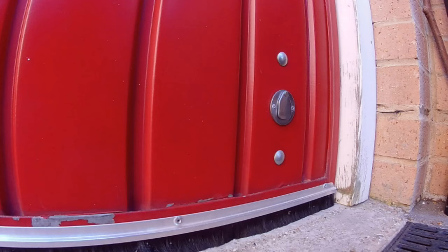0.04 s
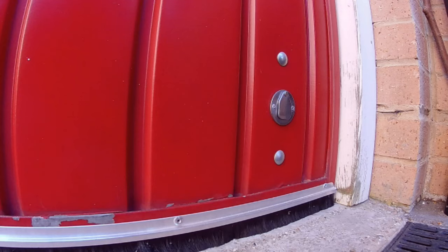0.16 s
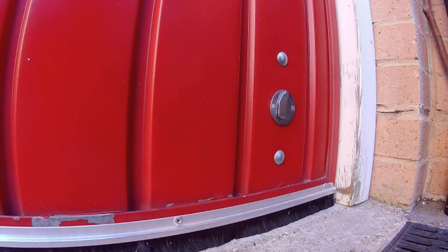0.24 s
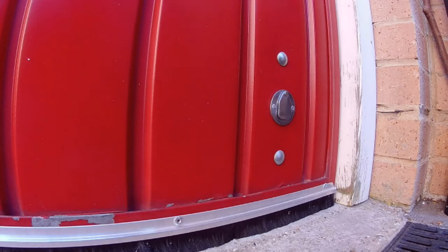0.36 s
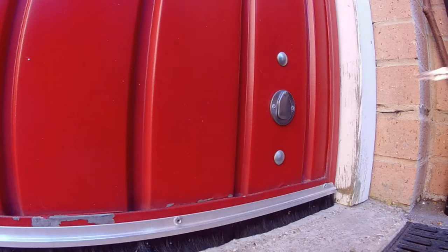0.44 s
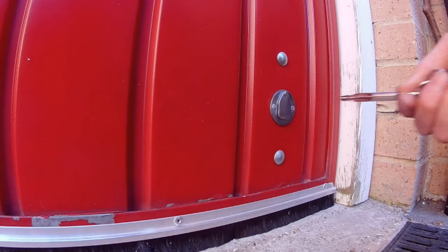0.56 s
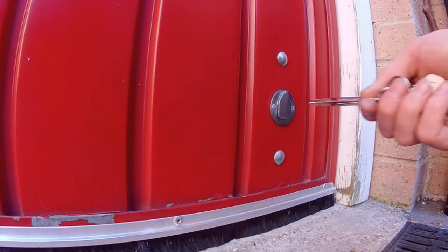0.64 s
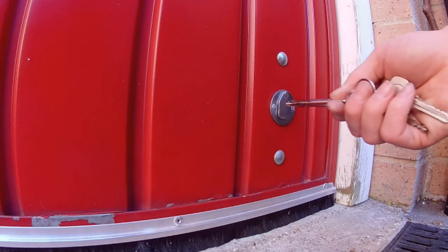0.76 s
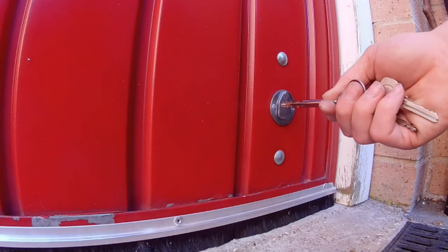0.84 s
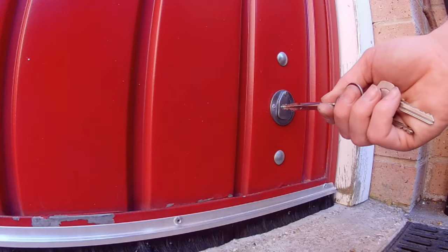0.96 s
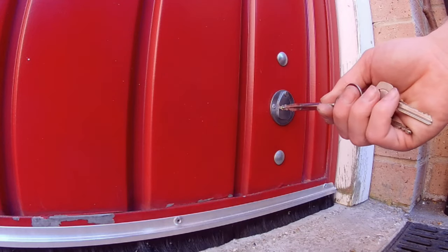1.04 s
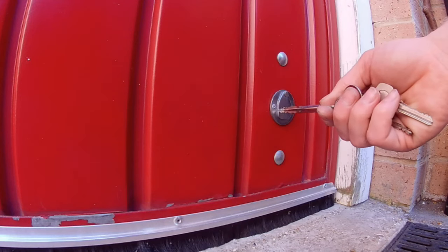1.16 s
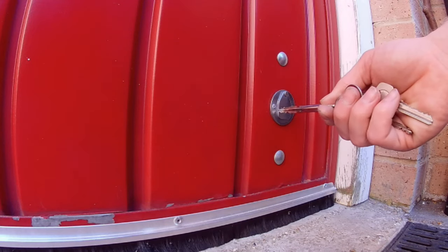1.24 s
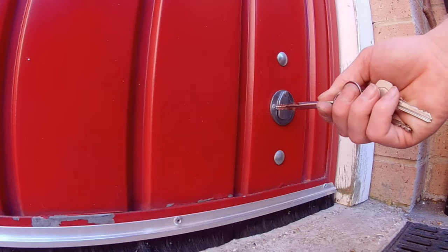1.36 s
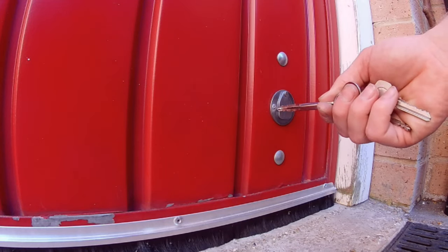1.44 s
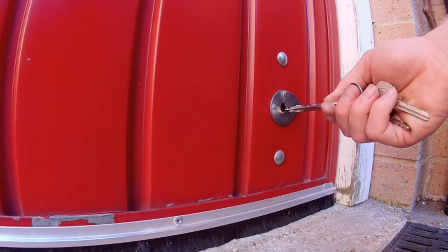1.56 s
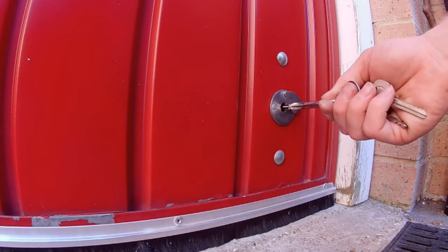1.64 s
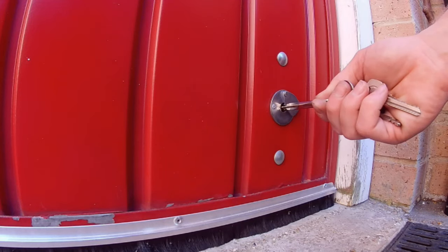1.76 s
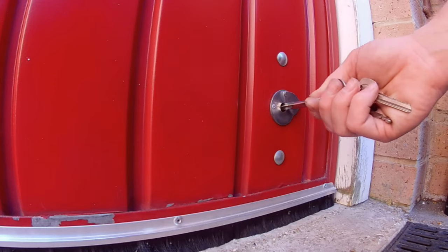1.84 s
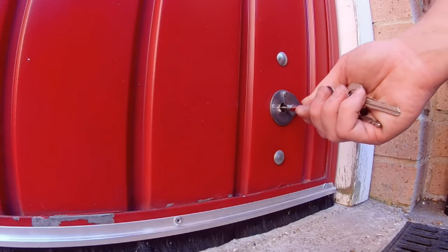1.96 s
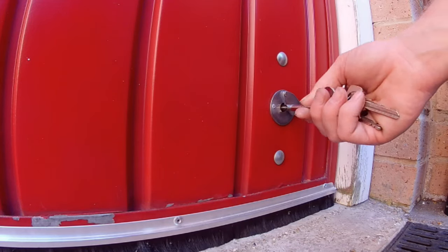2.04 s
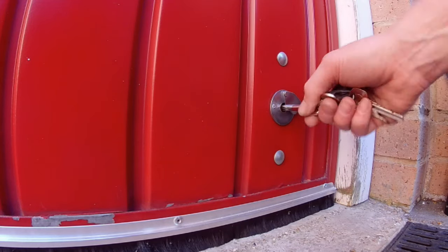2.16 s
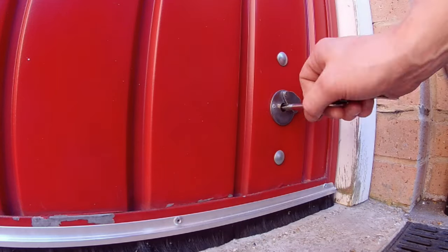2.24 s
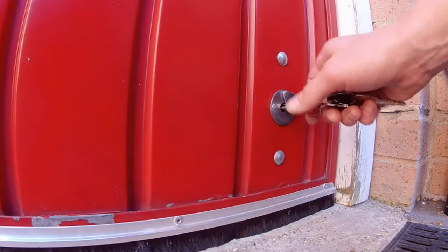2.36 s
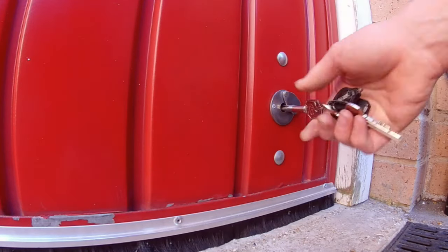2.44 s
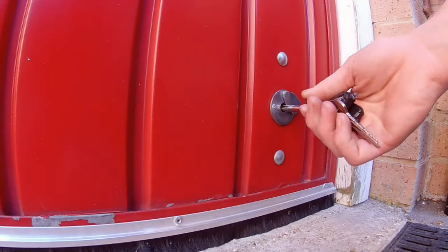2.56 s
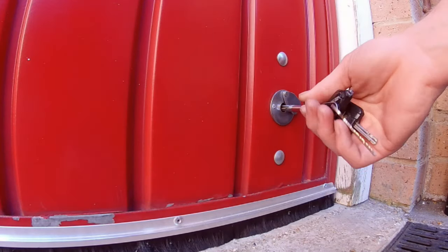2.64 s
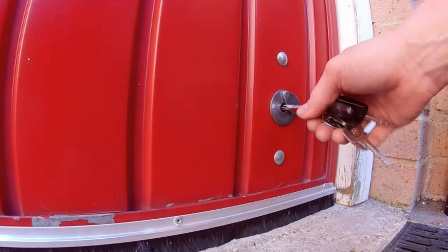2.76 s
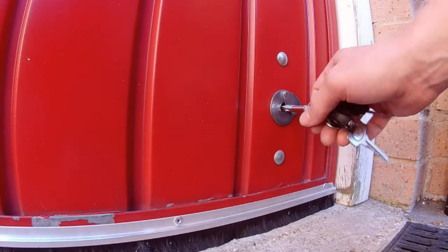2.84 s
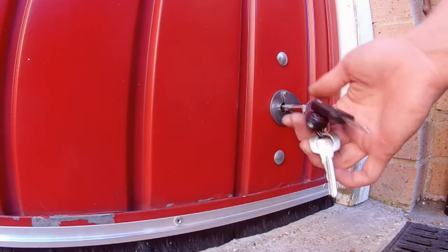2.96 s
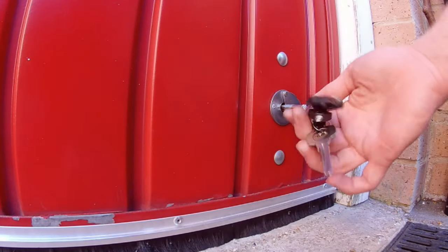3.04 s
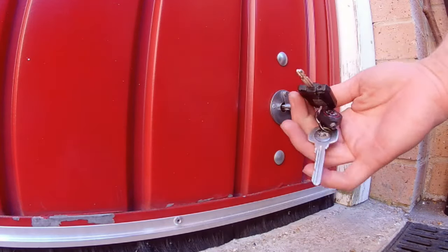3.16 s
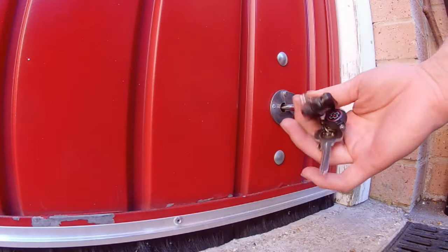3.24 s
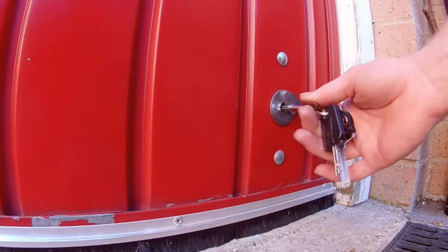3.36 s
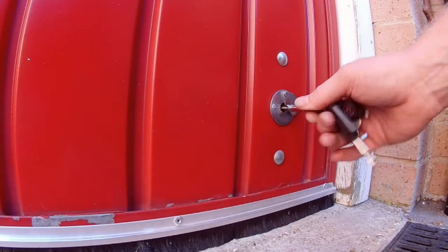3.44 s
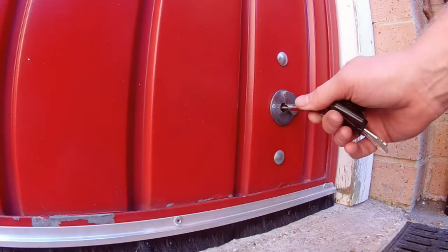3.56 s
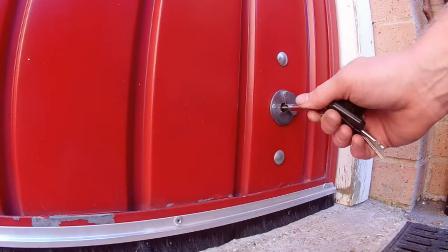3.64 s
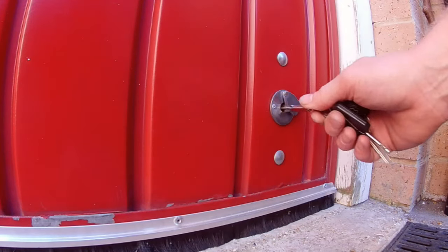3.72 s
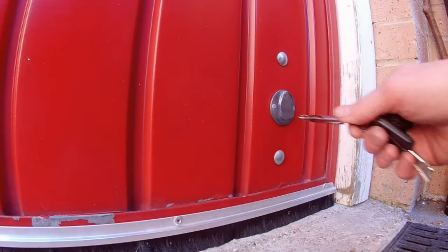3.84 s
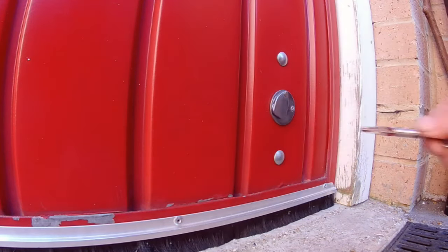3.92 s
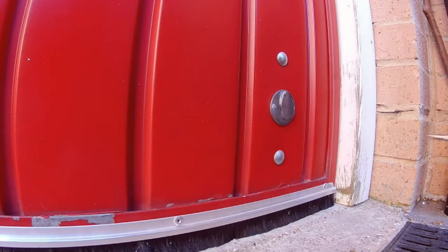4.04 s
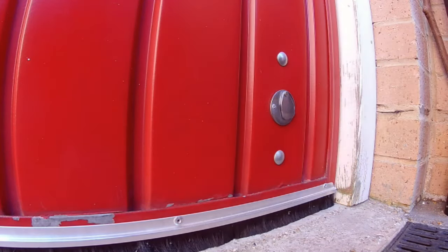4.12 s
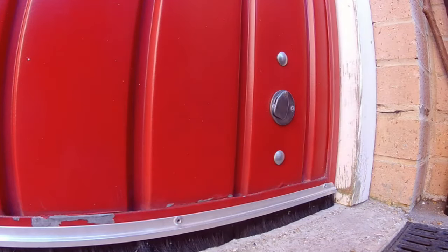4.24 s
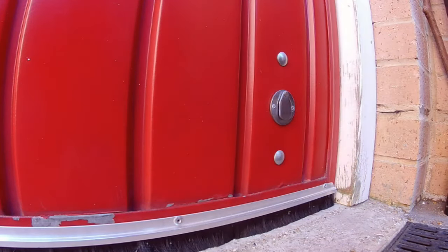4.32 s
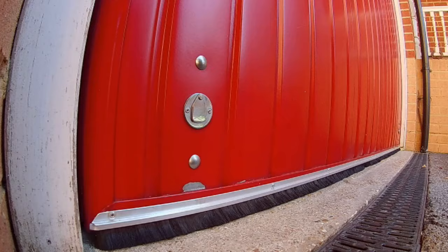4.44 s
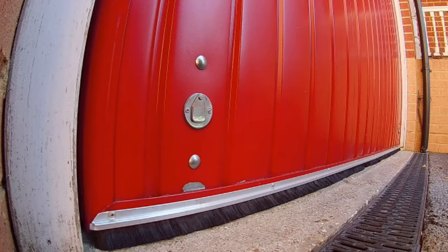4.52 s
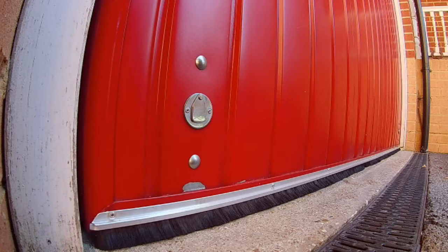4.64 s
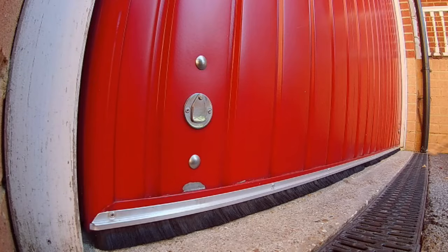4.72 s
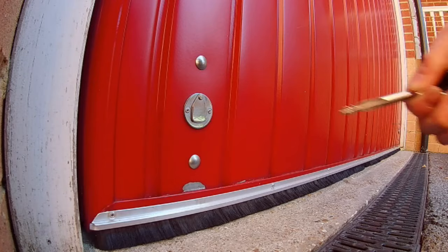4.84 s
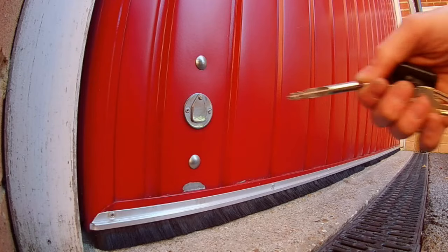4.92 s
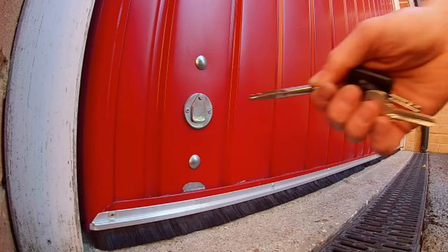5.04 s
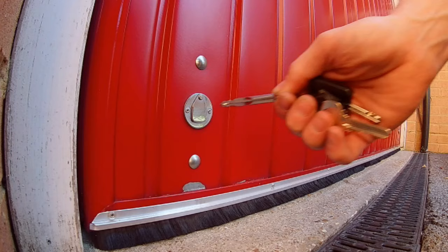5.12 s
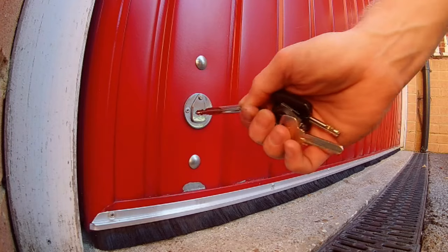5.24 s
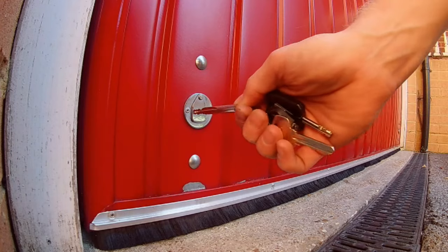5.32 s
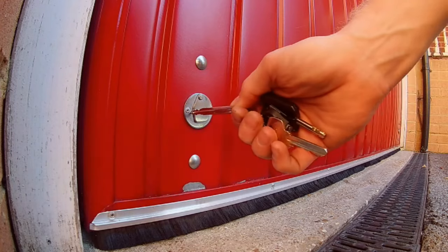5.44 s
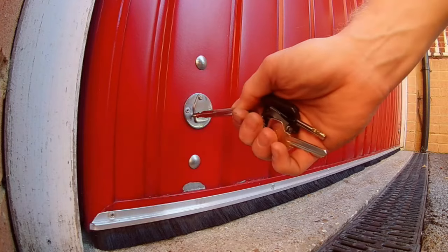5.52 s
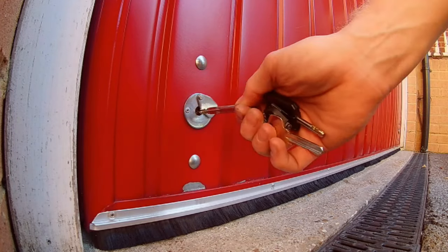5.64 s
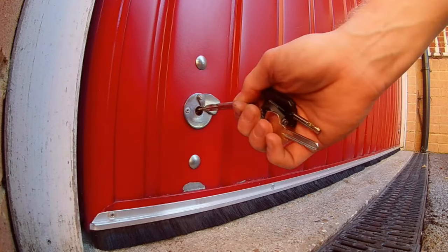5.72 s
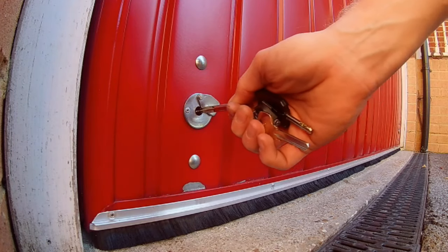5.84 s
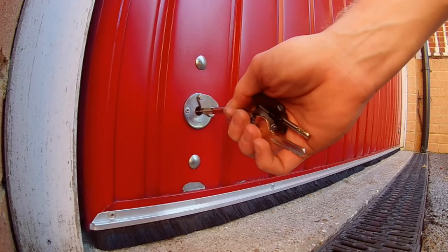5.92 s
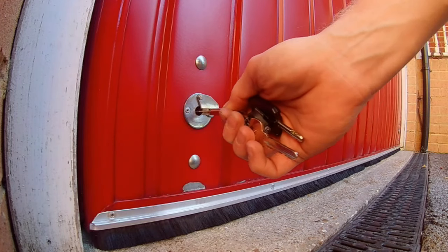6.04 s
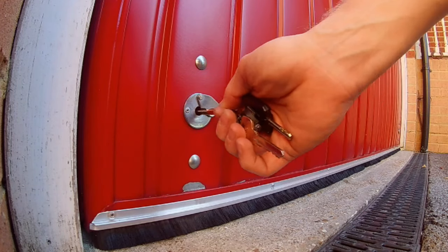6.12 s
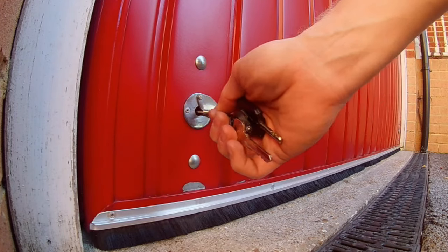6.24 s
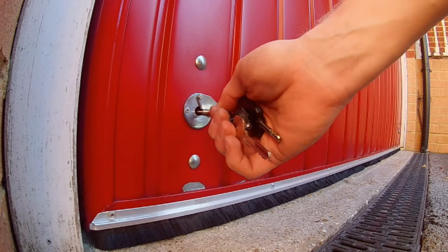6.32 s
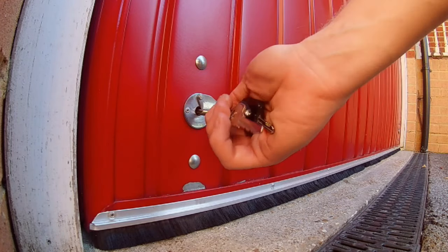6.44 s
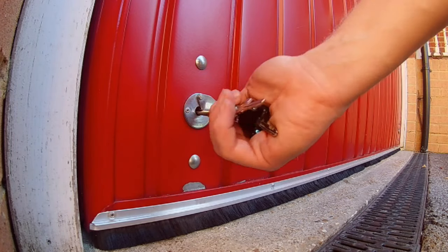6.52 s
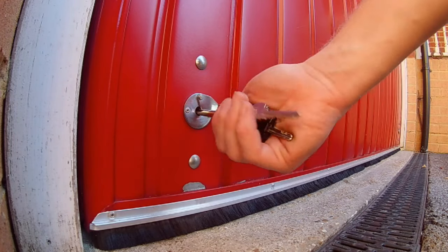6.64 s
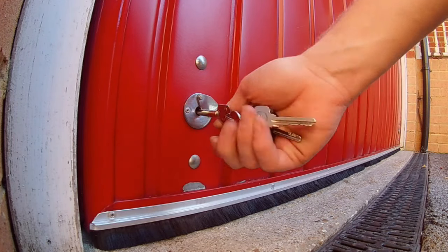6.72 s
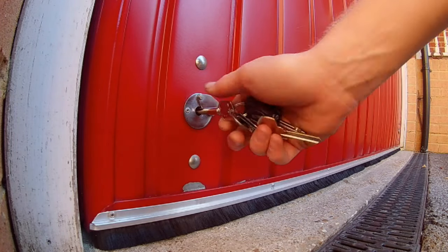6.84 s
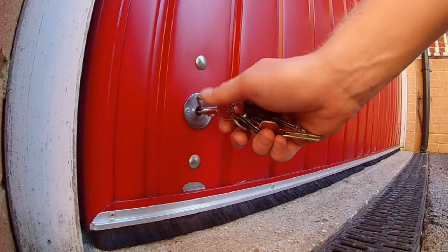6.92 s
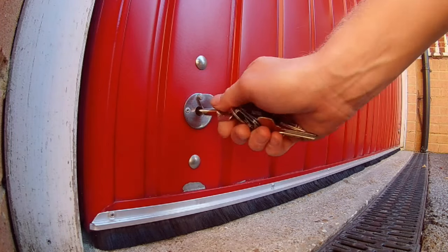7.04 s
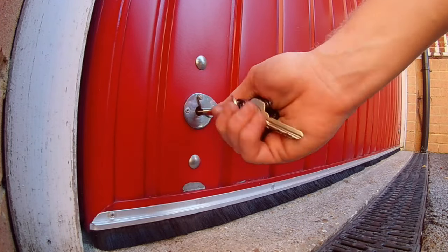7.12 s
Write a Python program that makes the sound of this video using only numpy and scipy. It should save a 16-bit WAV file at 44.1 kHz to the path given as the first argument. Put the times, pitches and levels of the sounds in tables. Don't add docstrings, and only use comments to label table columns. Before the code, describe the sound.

Quiet outdoor yard with low distant traffic hum and a faint high electronic tick. From about one second a key bumps, scrapes and clicks in a metal lock, shaking a steel garage door that booms and clangs dully. Loose keys chink briefly. After a short lull the perspective changes, and the knocking resumes, ending with a heavy clunk. Close small microphone near the ground.

```python
import sys
import numpy as np
from scipy import signal
from scipy.fft import next_fast_len
from scipy.io import wavfile
from scipy.ndimage import uniform_filter1d

SR = 44100
rng = np.random.default_rng(int(sys.argv[2]) if len(sys.argv) > 2 else 0)


def voltage_ratio(decibels):
    exponent = np.asarray(decibels, float) / 20
    return 10 ** exponent


def dump(signal):
    limited = np.clip(np.atleast_2d(signal).T, -1, 1)
    pcm = np.round(limited * 32767).astype(np.int16)
    wavfile.write(sys.argv[1], SR, pcm)


N = 316638
START_S, CUT_S = .045, 4.378
FILTER_HZ = np.fft.rfftfreq(8192, 1 / SR)
BIN_HZ = np.fft.rfftfreq(256, 1 / SR)


def evened(x):
    return x / np.sqrt(np.mean(x ** 2) + 1e-20)


def steadied(x, share):
    envelope = abs(signal.hilbert(x, next_fast_len(N))[:N])
    return evened(x / (envelope + 0.23) ** share)


def summed(levels_db):
    return 10 * np.log10((voltage_ratio(levels_db) ** 2).sum(0))


def read(points, hz):
    f, value = np.transpose(points)
    return np.interp(np.log(hz + 1), np.log(f + 1), value)


def add(mix, s, sound):
    part = mix[round(s * SR):][:len(sound)]
    part += sound[:len(part)]


def resonate(x, hz, width):
    r = np.exp(-np.pi * width / SR)
    return 2 * signal.lfilter([1 - r], [1, -r * np.exp(2j * np.pi * hz / SR)], x).real


def causal(gain_db):
    log_gain = np.log(voltage_ratio(np.r_[gain_db, gain_db[-2:0:-1]]))
    spectrum = np.exp(log_gain - 1j * signal.hilbert(log_gain).imag)
    return np.fft.ifft(spectrum).real[:4096]


# frequency in Hz, level in dB per Hz.
YARD_SPECTRUM = [(12, -39), (20, -30), (48, -4), (74, -12), (101, 0), (127, -7), (270, -24), (337, -16.5),
                 (607, -23), (825, -24), (1960, -35), (2460, -38), (9950, -49.5), (12800, -46.5),
                 (16000, -41.5)]
# time in seconds, change in dB.
TRAFFIC_DRIFT = [
    (.05, 9),
    (1.0, 2),
    (4.4, 3.5),
    (5.3, 6),
    (7.18, 3),
]


def yard():
    frames, hz = N // 256 + 5, np.fft.rfftfreq(1024, 1 / SR)
    a, b, patches = rng.standard_normal((frames, 513, 3)).T
    patches = evened(uniform_filter1d(uniform_filter1d(patches, 10, 0), 12, 1))
    traffic_band = np.exp(-(np.log((hz + 1) / 1100) / 0.3) ** 2)[:, None]
    traffic_db = traffic_band * np.interp(np.arange(frames) * 256 / SR, *np.transpose(TRAFFIC_DRIFT))
    z = (a + 1j * b) * voltage_ratio(read(YARD_SPECTRUM, hz)[:, None] + 1.9 * patches + traffic_db)
    return voltage_ratio(-60) * evened(signal.istft(z, nperseg=1024, noverlap=768)[1][:N])


# frequency in Hz, width in Hz.
SWAY_MODES = [
    (97.1, 15.9),
    (56.3, 23),
    (166.7, 170),
]
# level in dB of the main, slowest and upper sway.
IDLE_DB = [
    (-60, -73.5, -65.5),
    (-56.5, -60, -66),
]
# peak in seconds, push in dB, slowest and upper sway in dB re push.
SHOVES = [(1.001, -47.5, -8.5, -9.5), (1.2, -50, -23, -14), (1.4, -46.5, -5, -12.5), (1.74, -40, -4.5, -16),
          (1.92, -48, 3.5, -17), (2.0, -49, -1, -2), (2.11, -47, -14, -3.5), (2.229, -40, -7, -9.5),
          (2.45, -46.5, 2, -4), (2.749, -40.5, -9, -8.5), (2.899, -40.5, -9, -11.5), (3.15, -47, -3, -1),
          (3.356, -42.5, -0.5, -18), (3.48, -44.5, -16, -10), (3.68, -42, -1.5, -16), (3.9, -47, 2.5, -23),
          (4.149, -64, 12, -16), (5.4, -55.5, -4, 2.5), (5.57, -55.5, -19, -26), (5.78, -56.5, -13, 12.5),
          (6.05, -46, -3, 3), (6.17, -45.5, 1, -2), (6.38, -48.5, -10, 3), (6.68, -54, -1, -0.5),
          (6.962, -58.5, -4, 18), (7.12, -52.5, -1, 4)]


def panel():
    s, db, slow_db, upper_db = np.transpose(SHOVES)[:, :, None]
    t = np.arange(0, N + 64, 64) / SR
    rise_db_s, fall_db_s = 260, 46
    push_db = db - np.maximum(rise_db_s * (s - t), fall_db_s * (t - s))
    idle_db = np.array(IDLE_DB)[(t > CUT_S).astype(int)].T
    out = np.zeros(N)
    for (hz, width), share_db, idle in zip(SWAY_MODES, [0, slow_db, upper_db], idle_db):
        tremor = resonate(resonate(rng.standard_normal(N), hz, width), hz, 2 * width)
        level = voltage_ratio(summed(np.vstack([push_db + share_db, idle])))
        out += steadied(evened(tremor), .6) * np.interp(np.arange(N) / SR, t, level)
    return out


# first tick in seconds, number of ticks in each run.
TICK_RUNS = [
    (.043, [5, 5] + [4] * 9 + [3, 4, 4, 4, 1]),
    (4.424, [1] + [4] * 6 + [3, 4, 4, 4]),
]


def camera_ticks():
    out, t, frame_s = np.zeros(N), np.arange(900) / SR, .04
    shape = np.exp(-((t - .006) / .0038) ** 2) + .15 * np.exp(-t / .01) * (t > .006)
    for s, runs in TICK_RUNS:
        for count in runs:
            for k in range(count):
                late, size_db, hz = rng.standard_normal(3)
                wobble = uniform_filter1d(rng.standard_normal(900), size=90) * 5.
                blip = shape * np.sin(2 * np.pi * ((13100 + 50 * hz) * t - 22000 * t ** 2) + wobble)
                start = s - .004 + 0.011 * late + 0.0055 * (k == 0)
                add(out, start, voltage_ratio(-64.5 + 2.9 * size_db - 1.5 * (k == 0)) * blip)
                s += 2 * frame_s
            s -= frame_s
    return out


# start in seconds, peak in dB, length in seconds.
CLICKS = [
    (0.091, -46.5, 0.028),
    (0.157, -56, 0.033),
    (0.163, -53, 0.046),
    (0.176, -41, 0.018),
    (0.219, -34.5, 0.023),
]
# lowest frequency in Hz, highest frequency in Hz.
CLICK_BANDS = [(1400, 2040), (1500, 3600), (1780, 7000), (1300, 4400), (830, 3270)]


def clicks():
    out, t = np.zeros(N), np.arange(3000) / SR
    for (s, db, length), band_hz in zip(CLICKS, CLICK_BANDS):
        band = signal.butter(8, band_hz, "band", fs=SR, output="sos")
        snap = evened(signal.sosfilt(band, rng.standard_normal(len(t))))
        fall = voltage_ratio(-60 * np.maximum(t - .003, 0) / length)
        add(out, s, voltage_ratio(db - 12.0) * snap * fall * (1 - np.exp(-t / 0.00027)))
    return out


PART_EDGES_HZ = [
    (2600, 7400),
    (200, 750),
    (900, 2300),
    (8600, 11800),
]
# frequency in Hz, level in dB per Hz.
BODY = [
    [(150, -34), (250, -19), (360, -14), (649, -8), (799, -7), (1320, 3), (1870, -5), (2300, -7.5),
     (2600, -16.5), (3430, -26), (4080, -22), (6640, -28.5), (8030, -40.5), (9550, -38), (15800, -50.5)],
    [(150, -43.5), (250, -9), (336, 3), (520, -2.5), (733, -2.5), (1210, -6), (1630, -10), (2190, -15.5),
     (3740, -24), (5580, -21.5), (6870, -33.5), (8030, -43.5), (8610, -37), (10400, -47.5), (15800, -61.5)],
]
# (not used: every
# resonance is lifted by 4.5 dB, above 3 kHz by 6.6 dB).
RINGS = [
    [(600, 37, -6), (1330, 130, 0), (2060, 100, -9), (2650, 29, -16), (3180, 43, -22), (3810, 79, -18),
     (4230, 34, -17), (4740, 68, -19), (5700, 54, -22), (6250, 81, -23), (7140, 32, -27), (9480, 72, -28),
     (10200, 100, -30), (11270, 230, -30)],
    [(374, 13, -3), (1134, 140, 0), (1620, 15, -6), (2450, 140, -18), (3155, 38, -20), (3430, 35, -25),
     (4070, 250, -24), (5370, 68, -26), (5880, 160, -23), (6550, 310, -26), (9700, 87, -30),
     (11200, 360, -33), (10000, 150, -32), (12100, 53, -42)],
]


def door(place):
    db = read(BODY[place], FILTER_HZ)
    for hz, width, _ in RINGS[place]:
        db = db + (4.5 + 2.1 * (hz > 3000)) / (1 + (2 * (FILTER_HZ - hz) / width) ** 2)
    db = db - 16 * np.exp(-((FILTER_HZ - 8150) / 330) ** 2)
    db = db - 2.8 / (1 + (11600 / (FILTER_HZ + 1)) ** 16)
    powers = [np.sum(voltage_ratio(db[(FILTER_HZ > a) & (FILTER_HZ < b)]) ** 2) for a, b in PART_EDGES_HZ]
    return db, 10 * np.log10(np.array(powers) / len(FILTER_HZ))


PART_HZ = [4500, 400, 1400, 10000]


def spread(parts_db):
    weights = np.array([read(sorted(zip(PART_HZ, row)), BIN_HZ) for row in np.eye(4)])
    top_hz = 2280
    weights[0] += np.interp(BIN_HZ, [1400, top_hz, 1.15 * top_hz, 4500], [0, -.2, .2, 0])
    weights[2] = 1 - weights[[0, 1, 3]].sum(0)
    return weights.T @ parts_db


def shared(db, bite_db, weight_db, fizz_db):
    return [db + bite_db, db + weight_db, db, db + bite_db + fizz_db]


# start in seconds, strength in dB, bite on the lock in dB, weight on the sheet in dB.
BUMPS = [(0.9742, -58.5, 5.5, -17), (0.991, -37.5, -7, 3), (1.103, -50, -6.5, 10),
         (1.336, -37, -22.5, -6.5), (2.3386, -44.5, -16, 5), (2.4179, -38, -10.5, -1.5),
         (2.519, -46.5, 2, -14), (2.6689, -39, -16, -10), (3.1533, -35.5, -2.5, -2.5),
         (3.243, -50, -12, -38), (3.325, -33.5, -13, -3), (3.8395, -55.5, -13, 16), (4.1132, -60, -5, 5),
         (5.402, -36.5, -10, -6), (6.323, -46.5, -10.5, -22), (6.8814, -42, -21, -20),
         (6.9394, -35.5, -7.5, -16), (6.957, -16.5, -19.5, -30)]
# start in seconds, strength in dB, bite on the lock in dB, weight on the sheet in dB.
RAPS = [(1.4042, -37, -7.5, -8), (1.4255, -35.5, -5, -3.5), (1.5257, -41, -9, -10), (1.638, -33.5, -15, -3),
        (1.7041, -35.5, -15.5, -11), (1.7295, -35, -5, -1.5), (1.796, -32.5, -23, -2.5),
        (1.8262, -45, 2, -9), (1.895, -38.5, -12.5, 6), (2.068, -34.5, -6, -9), (2.178, -27, -11, -9.5),
        (2.3744, -55, 0, 13), (2.5719, -39.5, 1.5, 4.5), (2.7376, -24, -7, -6), (3.343, -38, -11, 0.5),
        (3.3612, -30, -14.5, -14), (3.408, -62, 19.5, 31), (3.666, -49, -5, -9)]
# start in seconds, strength in dB, bite on the lock in dB, weight on the sheet in dB.
LOOSE_RAPS = [(3.6407, -55, -1, -4), (3.7296, -26, -14, -2.5), (5.3689, -36, -15, -3.5),
              (5.613, -42, -18, -5.5), (5.652, -37, -15.5, -12), (5.6918, -40.5, -11, -20),
              (5.7214, -39.5, -5, -10), (5.7993, -36.5, -16, -3), (5.9694, -37, -15.5, -12),
              (5.9941, -41, -5.5, -14), (6.0151, -29, -15.5, -8.5), (6.113, -36.5, -13.5, -1),
              (6.1415, -31, -16.5, -15), (6.3718, -25, -24, -24), (6.4433, -37.5, -20, -24),
              (6.781, -45.5, -8.5, -4), (6.797, -40.5, -11, -32), (6.9529, -37, -5.5, 10.5),
              (6.995, -51, 4, 24.5), (7.0424, -28, -20, -25), (7.1103, -44, -10.5, 7)]
# key fizz in dB re lock ring, ring length as a factor.
KINDS = [
    (-23, 0.89),
    (-14.5, 0.66),
    (-6.5, 0.69),
]


def blows():
    grip = 0.0092
    out = []
    for rows, (fizz_db, ring) in zip([BUMPS, RAPS, LOOSE_RAPS], KINDS):
        for s, db, bite_db, weight_db in rows:
            out.append((s, *shared(db, bite_db, weight_db, fizz_db), ring - grip * bite_db))
    return sorted(out)


# frequency in Hz, time to fall 60 dB in seconds.
RING_T60 = [(150, 1), (600, 0.61), (1300, 0.54), (2300, 0.42), (2700, 0.35), (6500, 0.22), (9000, 0.18),
            (15000, 0.085)]
PLATE_HZ = [1142, 1149]


def knocks(place, rows):
    out, length, (colour_db, door_db) = np.zeros(N), SR // 3, door(place)
    low = (BIN_HZ < PART_EDGES_HZ[2][1])[:, None]
    high = (BIN_HZ > PART_EDGES_HZ[2][1])[:, None]
    uneven_depth_db = np.interp(BIN_HZ, [1500, 9000], [1.5, 5])[:, None]
    chatter_depth_db = np.interp(BIN_HZ, [1500, 4000], [1.3, 3.2])[:, None]
    plate_hz, age = PLATE_HZ[place], np.arange(length) / SR
    for s, *parts_db, ring in rows:
        _, t, z = signal.stft(rng.standard_normal(length), SR, nperseg=256, noverlap=192)
        uneven_db = uneven_depth_db * rng.standard_normal((len(z), 1))
        chatter = uniform_filter1d(rng.standard_normal(z.shape), size=5, axis=0)
        chatter_db = chatter_depth_db * evened(uniform_filter1d(chatter, size=5, axis=1))
        fall_db = -60 * t / (read(RING_T60, BIN_HZ)[:, None] * np.clip(ring, .15, 3))
        fall_db = fall_db - 2 * np.exp(-t / 0.0022) * low
        fall_db = fall_db - 1.5 * np.exp(-t / 0.0031) * high
        level_db = spread(np.array(parts_db) - door_db - 10.5)[:, None]
        z = z * voltage_ratio(level_db + fall_db + uneven_db + chatter_db)
        blow = signal.istft(z, SR, nperseg=256, noverlap=192)[1][:length]
        note = np.sin(2 * np.pi * plate_hz * (1 + 0.051 * rng.standard_normal()) * age)
        note_db = parts_db[2] - 5.5 - 60 * age / 0.1 - np.interp(plate_hz, FILTER_HZ, colour_db)
        blow = blow + voltage_ratio(note_db) * note * (1 - np.exp(-age / 0.0021))
        add(out, s, blow * (1 - np.exp(-age / 0.000074)) * (1 + 0.19 * np.exp(-age / 0.00088)))
    return out


def rub(place, rows):
    s, reach, db, bite_db, weight_db = np.transpose(rows)[:, :, None]
    slips = rng.random(N) < 270. / SR
    slips = slips * voltage_ratio(1.6 * np.minimum(rng.exponential(1, N), 4)) * rng.choice([-1, 1], N)
    ring = rng.standard_normal(3000) * voltage_ratio(-60 * np.arange(3000) / SR / 0.059)
    grit = evened(signal.oaconvolve(slips, ring)[:N]) + 0.17 * rng.standard_normal(N)
    _, t, z = signal.stft(grit, SR, nperseg=256, noverlap=192)
    fall_db = np.maximum(-15.5 * abs(t - s) / reach, -90)
    levels_db = np.array([summed(part_db + fall_db) for part_db in shared(db, bite_db, weight_db, -18.5)])
    z = z * voltage_ratio(spread(levels_db - door(place)[1][:, None]) - 10.0)
    return signal.istft(z, SR, nperseg=256, noverlap=192)[1][:N]


# middle in seconds, reach in seconds, pressure in dB, bite on the lock in dB, weight on the sheet in dB.
STROKES = [(1.21, 0.22, -65.5, -35, 23), (1.558, 0.15, -43.5, -11, 8.5), (1.62, 0.16, -51, -12, 16),
           (1.779, 0.12, -39.5, -4, -3), (2.143, 0.14, -37.5, -12, -15), (2.3, 0.28, -49, -13.5, 7.5),
           (2.49, 0.17, -64, -30, 20), (2.68, 0.085, -55, -1, -9), (2.82, 0.38, -43, -17, 7),
           (3.02, 0.23, -55, -16, 16), (3.257, 0.052, -41, -10, -22), (3.48, 0.71, -52, -32, 11),
           (3.759, 0.09, -42.5, -6.5, -10), (3.88, 0.1, -55.5, -30, -7), (3.97, 0.3, -66, -21, 28.5),
           (4.16, 0.053, -64, -14, -8), (4.27, 0.071, -59, -2.5, -10), (5.552, 0.14, -46.5, -18.5, 3.5),
           (5.753, 0.085, -34, -9, -6.5), (5.86, 0.39, -47, -45, -15), (6.28, 0.13, -72, 1, 30),
           (6.48, 0.28, -68.5, -15, 28.5), (6.72, 0.43, -57.5, -37, -5), (6.982, 0.19, -48.5, -10, -2),
           (7.16, 0.11, -45.5, -26, 4)]


def lock():
    out = np.zeros(N)
    for place in range(2):
        place_blows = [row for row in blows() if (row[0] > CUT_S) == place]
        place_strokes = [row for row in STROKES if (row[0] > CUT_S) == place]
        drive = knocks(place, place_blows) + rub(place, place_strokes)
        heard = signal.oaconvolve(drive, causal(door(place)[0]))[:N]
        out += heard * ((np.arange(N) > CUT_S * SR) == place)
    return out


# start in seconds, strength in dB, frequency in Hz, time to fall 60 dB in seconds.
JOLTS = [(0.991, -32, 1110, 0.059), (1.023, -48, 1362, 0.24), (1.102, -51, 1400, 0.2),
         (1.345, -48, 1414, 0.25), (1.431, -49, 1330, 0.6), (1.695, -31, 92.2, 0.88),
         (1.526, -38, 1340, 0.059), (1.893, -22.5, 90, 0.095), (1.969, -23, 95.7, 0.16),
         (2.065, -30, 92.7, 0.54), (2.191, -35.5, 1291, 0.15), (2.743, -31.5, 1287, 0.19),
         (2.745, -29.5, 1000, 0.14), (3.156, -36.5, 323, 0.097), (3.345, -38.5, 1383, 0.3),
         (3.729, -21.5, 1214, 0.064), (3.731, -32, 480, 0.069), (3.735, -35, 621, 0.14),
         (3.76, -51, 2143, 0.3), (3.77, -49, 687, 0.49), (3.791, -49.5, 533, 0.54),
         (5.404, -39, 1730, 0.049), (5.404, -31, 890, 0.027), (5.799, -37, 196, 0.26),
         (6.014, -34, 638, .12), (6.015, -40, 1055, 0.085), (6.036, -28, 99, 0.082),
         (6.110, -28, 90.6, 0.21), (6.138, -27.5, 93.2, 0.21), (6.390, -34.5, 1658, 0.083),
         (6.398, -31, 1220, 0.055), (6.953, -25, 1114, 0.071), (6.955, -31, 873, 0.048),
         (6.979, -23, 1200, 0.074), (6.976, -29.5, 162, 0.22), (6.984, -38, 330.4, 0.45),
         (7.008, -37, 1610, 0.23), (7.029, -38, 238, 0.2), (7.062, -33, 1260, 0.09)]


def jolts():
    out, t = np.zeros(N), np.arange(SR // 3) / SR
    for s, db, hz, t60 in JOLTS:
        rise = 1 - np.exp(-t / (0.24 / hz + 0.0016))
        add(out, s, -voltage_ratio(db - 60 * t / t60) * rise * np.sin(2 * np.pi * hz * t))
    return out


# start in seconds, peak in dB, lowest frequency in Hz, highest frequency in Hz.
SNAPS = [(1.398, -49, 2000, 11700), (1.640, -42.5, 3500, 7000), (2.419, -46, 1500, 7450),
         (2.522, -50, 2530, 7000), (3.014, -44, 1200, 3500), (3.2572, -44, 1210, 3500),
         (3.267, -46, 1200, 3500), (3.4083, -35.5, 2200, 7500), (5.7222, -43, 4000, 12000),
         (5.972, -44, 2970, 11700), (5.9945, -48, 2970, 11900), (6.014, -32, 1980, 11700),
         (6.629, -50, 1200, 7000), (6.638, -45.5, 1190, 10200), (6.656, -53, 1200, 4500)]


def snaps():
    out, t = np.zeros(N), np.arange(2000) / SR
    for s, db, low_hz, high_hz in SNAPS:
        band = signal.butter(4, [low_hz, high_hz], "band", fs=SR, output="sos")
        burst = evened(signal.sosfilt(band, rng.standard_normal(len(t))))
        add(out, s, voltage_ratio(db - 9 - 60 * t / 0.022) * burst * (1 - np.exp(-t / 0.00035)))
    return out


# frequency in Hz, level in dB, time to fall 60 dB in seconds.
BLADE = [
    [(2110, 13, 0.022), (2650, 5.5, 0.036), (3850, 5, 0.016), (4200, -4, 0.14), (4760, 3, 0.022),
     (5700, -3, 0.019), (6300, -6, 0.011), (6760, -3.5, 0.025), (7200, -2, 0.016), (9500, -4.5, 0.035),
     (10450, -6.5, 0.037)],
    [(4005, 0.5, 0.093), (4460, -1.5, 0.05), (4850, -2.5, 0.0444), (5440, 9.5, 0.023), (5680, -7.5, 0.12),
     (6610, 11, 0.03), (9340, 7, 0.013), (9450, -1, 0.058), (10080, 8.5, 0.025)],
]
# start in seconds, strength in dB, mode struck most in Hz, spread in octaves.
TICKS = [(1.405, -44, 4760, .1), (1.425, -63, 4760, 0.055), (1.702, -48, 4760, .1),
         (1.733, -43, 4760, 0.13), (1.766, -49, 4760, 0.12), (1.797, -53, 4760, .1),
         (1.872, -46.5, 5700, 0.26), (2.174, -44, 2650, 0.85), (2.188, -45.5, 4200, 0.069),
         (2.57, -45, 4200, 0.22), (2.573, -48, 10450, 0.19), (2.721, -44, 5700, .4),
         (2.734, -39.5, 4760, 2), (2.877, -55.5, 3850, 0.089), (3.064, -46, 6300, 0.27),
         (3.119, -44.5, 7200, 0.15), (3.153, -45, 4200, 0.12), (3.152, -48, 10200, 0.17),
         (3.256, -50.5, 2110, 0.24), (3.361, -45.5, 4200, 0.14), (3.408, -51, 6760, 0.36),
         (3.7278, -40.5, 6300, 0.64), (5.372, -49.5, 4005, 0.13), (5.694, -52.5, 5680, 0.23),
         (5.724, -52.5, 5440, 0.11), (5.723, -55, 9450, 0.23), (5.761, -54, 4005, .3),
         (5.779, -54, 4005, .1), (5.802, -63, 5680, .3), (5.826, -64, 5680, .3), (5.972, -58, 5680, 0.34),
         (6.050, -53, 5680, 0.16), (6.139, -54, 5440, .1), (6.388, -56, 4460, 0.52),
         (6.446, -59.5, 4460, 0.54), (6.939, -53, 6610, 0.24), (6.958, -52, 9450, 0.18),
         (6.962, -60, 4005, 0.42), (6.972, -42, 4460, 0.2), (7.002, -61, 8150, 0.53),
         (7.045, -53, 8100, 0.54)]


def ticks():
    out, t = np.zeros(N), np.arange(3000) / SR
    for s, db, aim_hz, octaves in TICKS:
        hz, mode_db, t60 = np.transpose(BLADE[int(s > CUT_S)])[:, :, None]
        hz = hz * (1 + .012 * rng.standard_normal(hz.shape))
        off_db = -12 * (np.log2(hz / aim_hz) / max(octaves, .03)) ** 2
        ring = voltage_ratio(db + mode_db + off_db - 60 * t / t60)
        snap = voltage_ratio(db + mode_db - 12 - 60 * t / 0.0075)
        tick = ((ring + snap) * np.sin(2 * np.pi * hz * t)).sum(0)
        add(out, s, tick * (1 - np.exp(-t / 0.00048)))
    return out


# frequency in Hz, width in Hz, level in dB.
KEYS = [
    [(2240, 260, 13), (3900, 79, 6), (4170, 29, 5), (5500, 38, -5), (5850, 55, -10), (6550, 220, -13),
     (7100, 36, -7), (9870, 89, -11)],
    [(2010, 150, 26), (2500, 29, 6), (3860, 64, -9), (4270, 58, -27), (6530, 130, -7), (8100, 210, -19),
     (9380, 140, -9)],
]
# start in seconds, peak in dB, length in seconds, shimmer of the thin key in dB.
CHINKS = [(2.959, -43.5, 0.012, -30), (2.9875, -44, 0.012, -13), (3.026, -43, 0.045, -11),
          (3.06, -45, 0.19, -2), (3.068, -46, 0.012, -31), (3.117, -46.5, 0.094, -6),
          (3.147, -39.5, 0.062, -4), (3.26, -49.5, 0.024, -44), (3.261, -47, 0.049, -44),
          (6.622, -50, 0.041, -22), (6.632, -46, 0.094, -30), (6.66, -48, 0.032, -49),
          (6.729, -53, 0.019, -41)]


def chinks():
    out, t = np.zeros(N), np.arange(5000) / SR
    thin_hz, wide_hz = 11900, 12400
    for s, db, length, shimmer_db in CHINKS:
        burst = rng.standard_normal(len(t))
        size_db = 1.5 * rng.standard_normal(12)
        rings = np.zeros(len(t))
        for (hz, width, gain_db), key_db in zip(KEYS[int(s > CUT_S)], size_db):
            key = resonate(resonate(burst, hz, 310), hz, 150 + 6.2 * width)
            rings += voltage_ratio(.5 * gain_db + key_db) * evened(key)
        sound = evened(rings) * voltage_ratio(-60 * np.maximum(t - .004, 0) / length)
        thin = evened(resonate(resonate(burst, thin_hz, 400), thin_hz, 70))
        wide = evened(resonate(resonate(burst, wide_hz, 1200), wide_hz, 1200))
        sound += voltage_ratio(shimmer_db) * (thin + 0.53 * wide) * voltage_ratio(-60 * t / 0.13)
        add(out, s, voltage_ratio(db - 11.5) * sound * (1 - np.exp(-t / 0.00051)))
    return out


def scene():
    near = lock() + chinks() + clicks() + panel() + ticks() + jolts() + snaps()
    power_db = 10 * np.log10(abs(uniform_filter1d(near ** 2, 900)) + 1e-12)
    fall_db = np.arange(N) * 26.0 / SR
    held_db = np.maximum.accumulate(power_db + fall_db) - fall_db
    over_db = np.maximum(held_db + 50.5, 0)
    background = (yard() + camera_ticks()) / voltage_ratio(0.15 * uniform_filter1d(over_db, 400))
    return (near + background)[None]


# frequency in Hz, step in dB re local level.
COARSE_STEPS = [(1500, -25), (3500, -1), (6500, 5), (9000, 5), (12000, 5), (13000, 1), (15000, 5)]


def coarse(x):
    hz, _, z = signal.stft(x, SR, "cosine", nperseg=2048, noverlap=1024)
    local = np.sqrt(abs(uniform_filter1d(abs(z) ** 2, size=20, axis=-2)) + 1e-24)
    loud = np.sqrt((abs(z[:, hz > 300]) ** 2).sum(-2, keepdims=True))
    step = np.clip(voltage_ratio(-50) * loud, local, voltage_ratio(2) * local) * voltage_ratio(read(COARSE_STEPS, hz))[:, None]
    rounded = step * (np.round(z.real / step) + 1j * np.round(z.imag / step))
    both = np.array([z, rounded]) * (hz < 15850)[:, None]
    plain, stored = signal.istft(both, SR, "cosine", nperseg=2048, noverlap=1024)[1][..., :N]
    treble = np.diff(plain, 3, prepend=np.zeros((1, 3))) ** 2
    attack = uniform_filter1d(treble, size=300) / (uniform_filter1d(treble, size=2000) + 1e-20)
    hidden = np.clip(1.5 * attack, 0, 1) ** .5
    return plain + hidden * (stored - plain)


def roll_off(x):
    return signal.sosfilt(signal.butter(12, 16470, fs=SR, output="sos"), x)


def record(dry):
    t = np.arange(N) / SR
    lead_in = np.clip((t - START_S) / 0.002, 0, 1)
    dip = np.clip(abs(t - CUT_S) / 0.0056, .1, 1)
    return roll_off(coarse(dry) * (lead_in * dip))


dry = scene()
out = record(dry)
dump(out)
```